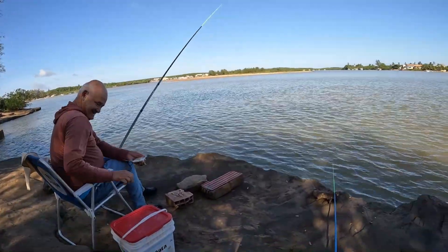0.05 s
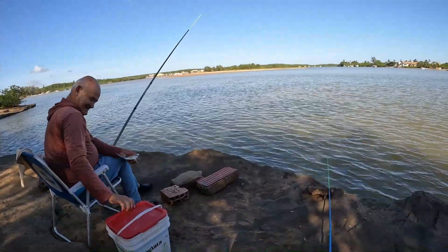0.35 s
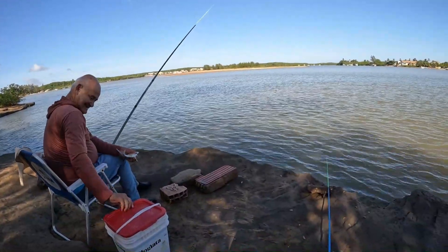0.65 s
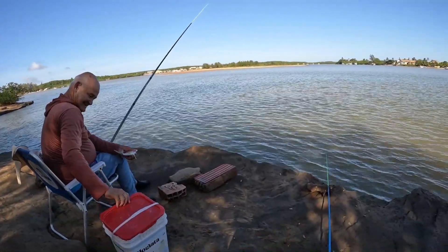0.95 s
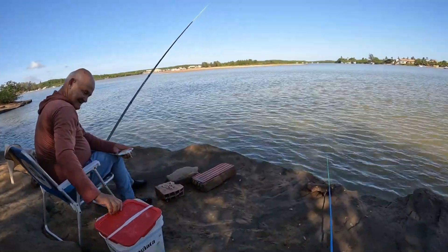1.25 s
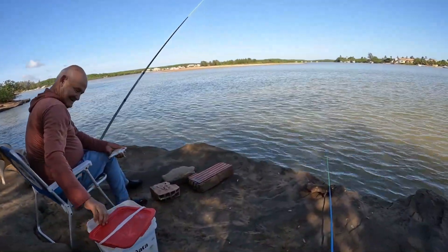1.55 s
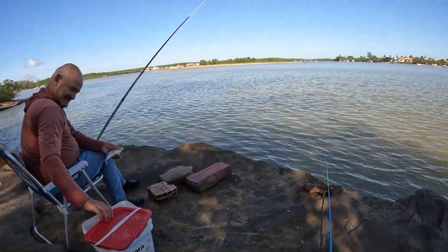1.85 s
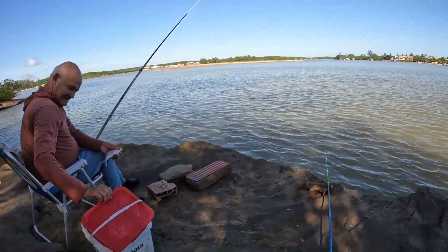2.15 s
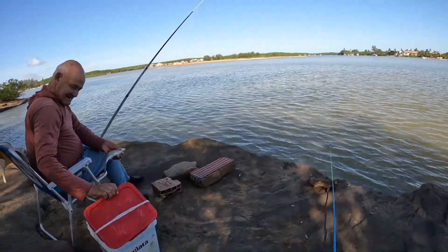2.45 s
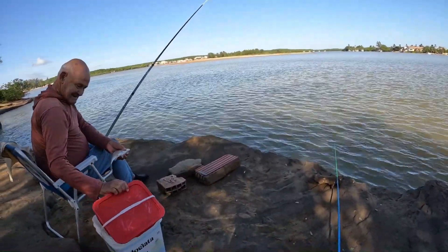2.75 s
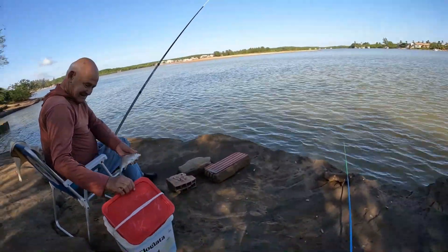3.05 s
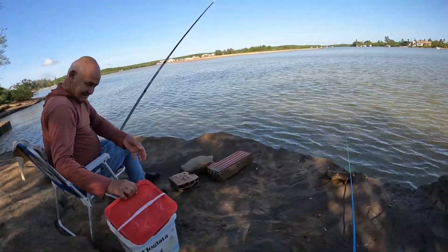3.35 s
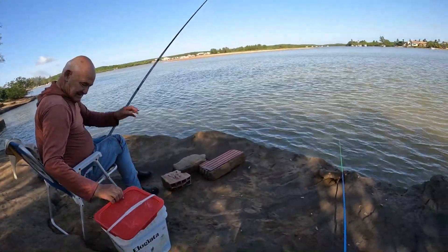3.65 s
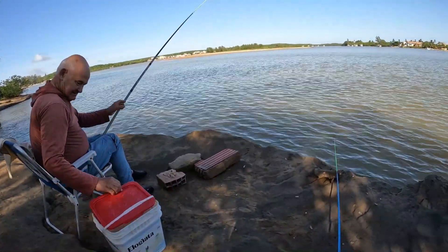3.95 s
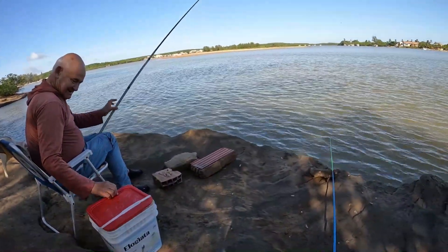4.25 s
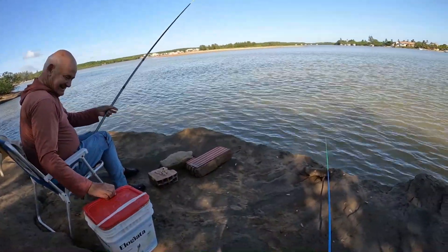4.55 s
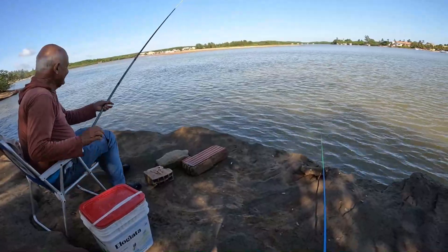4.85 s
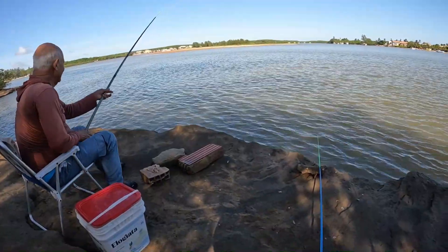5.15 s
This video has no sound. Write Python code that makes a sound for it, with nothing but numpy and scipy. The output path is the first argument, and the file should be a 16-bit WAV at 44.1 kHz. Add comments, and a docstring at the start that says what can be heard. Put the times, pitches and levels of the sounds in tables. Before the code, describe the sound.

Soft wind rumbles on the microphone throughout, with a faint hiss of river ripples. A sleeve brushes past at the very start, and very faint, distant birdlike whistles come between 0.6 and 2 seconds. Close on the left, a plastic bucket knocks sharply at about 1.1 seconds, with a hollow thump and a short scrape, and again at 1.6. From 2.1 to 2.9 seconds its lid clacks and rattles while the base scrapes over gritty ground, squeaking briefly. After a short lull, a busier stretch runs from 3.4 to 4.7 seconds, with repeated dragging strokes, lid clacks, dull thumps from the flexing walls and a few small squeaks. The loudest knocks land at about 4 and 4.5 seconds. Then the bucket goes quiet, leaving a light rustle of cloth, wind and water until a little past 5 seconds.

```python
"""Wind rumbles on the microphone and ripples hiss faintly along a riverbank; far off, thin birdlike whistles.
Close by on the left a sleeve brushes past and a hand grips a plastic bucket by its snap-on lid,
tilts it, drags it over gritty ground and sets it down. The lid clacks on the rim, the walls flex
with dull thumps, and the base scrapes in short strokes, squeaking now and then as the plastic rubs."""
import sys
import numpy as np
from scipy import signal
from scipy.io import wavfile
from scipy.ndimage import uniform_filter1d

SR = 44100
rng = np.random.default_rng(int(sys.argv[2]) if len(sys.argv) > 2 else 0)


def wav_out(sig):
    """Save sig, one row per channel (or a flat mono array), as 16-bit PCM at SR to the path in sys.argv[1]."""
    wavfile.write(sys.argv[1], SR, np.round(np.clip(np.atleast_2d(sig).T, -1, 1) * 32767).astype(np.int16))


N = 233906
RING_SAMPLES = SR // 3
WALL_TOP_HZ, PANEL_TOP_HZ = 418, 2410   # where the walls' boom and the lid's clack end


def from_db(db):
    """Decibels to gain."""
    return 10 ** (np.asarray(db) / 20)


def decay(t, t60):
    """A gain that falls 60 dB in t60 seconds."""
    return from_db(-60 * t / t60)


def unit_rms(x):
    """Scale to rms 1."""
    return x / np.sqrt(np.mean(x ** 2) + 1e-20)


def unit_burst(x):
    """Scale so that the loudest 4 ms have rms 1."""
    return x / np.sqrt(uniform_filter1d(x ** 2, size=176).max() + 1e-20)


def at_hz(table, hz, column=1):
    """Read a column of a spectrum on a log-frequency axis."""
    table = np.array(table)
    return np.interp(np.log(hz), np.log(table[:, 0]), table[:, column])


def passband(x, hz, kind, order=2):
    """Causal Butterworth filter."""
    return signal.sosfilt(signal.butter(order, hz, kind, fs=SR, output="sos"), x)


def emphasise(x, hz, boost_db, q):
    """Lift one resonance out of a sound."""
    return x + (from_db(boost_db) - 1) * signal.lfilter(*signal.iirpeak(hz, q, fs=SR), x)


def add(track, s, sound):
    """Mix a sound into a track from time s."""
    start = max(0, round(s * SR))
    track[start:start + len(sound)] += sound[:N - start]


def drift(per_s, count):
    """A wandering line through per_s normal random values a second."""
    knots = rng.standard_normal(4000)
    return np.interp(np.arange(count) * per_s / SR, np.arange(len(knots)), knots)


def noise_bands(count, channels, low_hz):
    """Half-octave bands of white noise, neighbours unrelated: (centre Hz, channels x count)."""
    edges = low_hz * 2 ** np.arange(0, np.log2(SR / 2.2 / low_hz), .5)
    white = rng.standard_normal((2, channels, count))
    return [(np.sqrt(lo * hi), passband(white[k % 2], [lo, hi], "band"))
            for k, (lo, hi) in enumerate(zip(edges, edges[1:]))]


def glides(rows, waver_per_s):
    """Gliding tones with an unsteady pitch, each fading in and out."""
    out = np.zeros(N)
    for s, length, start_hz, end_hz, level_db, waver in rows:
        count = int(length * SR)
        hz = np.linspace(start_hz, end_hz, count) * (1 + waver * drift(waver_per_s, count))
        tone = np.sqrt(2) * np.sin(2 * np.pi * np.cumsum(hz) / SR)
        add(out, s, from_db(level_db) * np.hanning(count) * tone)
    return out


# how alike the open air is on the microphone's two sides: f/Hz, likeness/0-1
AIR_LIKENESS = [(25, 0.92), (60, 1), (300, 0.91), (1000, 0.18), (3000, 0.67), (8000, 0.7), (14000, .3)]
def open_air(spectrum, bands, patchy_db, patches_per_s):
    """Noise all around the microphone, each band swelling and sinking on its own; rms 1."""
    out = 0
    for hz, (mid, side) in bands:
        alike = at_hz(AIR_LIKENESS, hz)
        gain = from_db(at_hz(spectrum, hz) + patchy_db * drift(patches_per_s, N))
        out = out + gain * (np.sqrt(1 + alike) * mid + np.sqrt(1 - alike) * side * [[1], [-1]])
    return unit_rms(out)


# wind right on the microphone: f/Hz, relative density/dB
WIND_SPECTRUM = [(15, 4.5), (30, -3), (55, 3.5), (90, 0.5), (140, -10.5), (200, -9.5), (290, -21.5),
                 (380, -24), (600, -46), (1200, -65)]
# swells of low rumble on the microphone, from wind and the handled bucket: t/s, relative level/dB
RUMBLE_SWELLS = [(0.0, -53.5), (1.2, -36.5), (1.95, -55.5), (2.39, -38.5), (4.04, -55), (5.3, -48)]
def low_rumble(bands, mean_db=-44, swell_share=0.33):
    """A lumpy rumble of wind and handling on the microphone; it follows a share of the swells' swing."""
    swell_db = np.interp(np.arange(N) / SR, *np.transpose(RUMBLE_SWELLS))
    low_bands = [b for b in bands if b[0] < WIND_SPECTRUM[-1][0]]
    rumble = open_air(WIND_SPECTRUM, low_bands, patchy_db=4.5, patches_per_s=32)
    return from_db(mean_db + swell_share * (swell_db - swell_db.mean())) * rumble


# water at the shoreline, some way off: f/Hz, relative density/dB
RIPPLE_SPECTRUM = [(300, -6), (700, -9), (1300, 2.5), (2300, -2.5), (3500, -10.5), (5000, -6), (7000, -9.5),
                   (10000, -19.5), (12000, -28), (16000, -45)]
# swells of the background water hiss: peak t/s, half width/s, wash swell/dB, fizz swell/dB
HISS_SWELLS = [(.03, 0.19, 7.5, 11), (.55, 0.36, 4, 0.5), (1.25, 0.33, 8, 9.5), (3.3, .15, 4.5, 6.5),
               (4.78, 0.22, 10, 3.5), (5.05, 0.41, 1, 10)]
def ripples(bands, base_wash_db=-70.5, base_fizz_db=-79, fizz_from_hz=4000):
    """Water hisses, a wash with a fizz on top: louder at first, then sinking, and up again at the end."""
    t = np.arange(N) / SR
    wash_db, fizz_db = sum(np.outer(swells_db, np.exp(-((t - s) / width) ** 2))
                           for s, width, *swells_db in HISS_SWELLS)
    wash_bands = [b for b in bands if RIPPLE_SPECTRUM[0][0] < b[0] < fizz_from_hz]
    fizz_bands = [b for b in bands if b[0] >= fizz_from_hz]
    wash = open_air(RIPPLE_SPECTRUM, wash_bands, patchy_db=3, patches_per_s=17)
    fizz = open_air(RIPPLE_SPECTRUM, fizz_bands, patchy_db=0.5, patches_per_s=12)
    return from_db(base_wash_db + wash_db) * wash + from_db(base_fizz_db + fizz_db) * fizz


# rubbing cloth: f/Hz, relative density/dB
CLOTH_SPECTRUM = [(700, -9), (1200, -14), (1900, 5.5), (3000, -6.5), (5000, -6), (7000, -7), (9500, -20),
                  (12000, -20), (15000, -28)]
# the arm passes near the microphone: t/s, length/s, level/dB
SLEEVE_SWISHES = [(0.101, 0.084, -47.5), (0.153, 0.068, -62), (3.16, 0.13, -65.5), (4.67, 0.12, -58),
                  (5.248, 0.071, -65)]
def sleeve(snag_db=3.5, snags_per_s=396):
    """Short swells of fibre noise, roughened by the snagging weave."""
    out = np.zeros(N)
    for s, length, level_db in SLEEVE_SWISHES:
        count = int(length * SR)
        bands = noise_bands(count, channels=1, low_hz=640)
        fibres = sum(from_db(at_hz(CLOTH_SPECTRUM, hz)) * noise[0] for hz, noise in bands)
        snags = from_db(snag_db * drift(snags_per_s, count))
        add(out, s, from_db(level_db) * np.hanning(count) * unit_rms(fibres * snags))
    return out


# clear modes of the lidded bucket: f/Hz, relative level/dB, t60/s
BUCKET_MODES = [(69.7, -4, 0.2), (103.7, -0.5, 0.18), (131, -8.5, 0.3), (188, -6, 0.29), (223, 2.5, 0.19),
                (258.3, -3.5, 0.19), (294.1, 4, 0.14), (320.4, 0.5, 0.13), (367, -13, 0.175),
                (435, -9, 0.054), (462, -2.5, 0.068), (589, 2, 0.032), (672, -18, 0.2), (876, 0.5, 0.15),
                (877, 0.5, 0.073), (980, -0.5, 0.027), (1076, -7.5, 0.051), (1120, -6, 0.22),
                (1256, -0.5, 0.091), (1375, -4, 0.13), (1607, -37, 0.052), (1849, -6.5, 0.22),
                (2000, -8, 0.14), (2454, -3.5, 0.06)]
# crowded, quickly damped modes of the plastic: f/Hz, relative density/dB, t60/s
PLASTIC_CLATTER = [(99, 13, 0.088), (290, 4.5, 0.045), (455, -6.5, 0.14), (750, 2.5, 0.039),
                   (1220, 1.5, 0.054), (2400, 0, 0.05), (3750, -3, 0.032), (6200, -9.5, 0.053),
                   (8060, -17.5, 0.071), (10400, -46, 0.0315), (11900, -16, 0.0056), (15000, -29, .02)]
def bucket_rings(count, modes_db, vary_db, detune=0.0018, edge_own_share=0.79):
    """The bucket tapped at count spots: clear modes, detuned by the grip, over a short dense clatter."""
    t = np.arange(RING_SAMPLES) / SR
    hz, level_db, t60 = np.transpose(BUCKET_MODES)
    modes = np.sin(2 * np.pi * hz[:, None] * t) * decay(t, t60[:, None])
    strengths = from_db(modes_db + level_db + vary_db * rng.standard_normal((count, len(hz))))
    strengths *= rng.choice([-1, 1], strengths.shape)
    grips = 1 + detune * rng.standard_normal(count)
    rings = np.array([np.interp(t * grip, t, ring) for grip, ring in zip(grips, strengths @ modes)])
    short = RING_SAMPLES // 4
    for centre, noise in noise_bands(short, count + 1, low_hz=80):
        # the small stiff edges ring partly alike wherever the bucket is touched
        own = edge_own_share if centre > PANEL_TOP_HZ else 1
        clatter = np.sqrt(own) * noise[1:] + np.sqrt(1 - own) * noise[0]
        fade = decay(t[:short], at_hz(PLASTIC_CLATTER, centre, column=2))
        rings[:, :short] += from_db(at_hz(PLASTIC_CLATTER, centre)) * clatter * fade
    return rings


def registers(x):
    """Split into the boom of the walls, the clack of the lid panel and the snap of the edges."""
    return (passband(x, WALL_TOP_HZ, "low", order=4),
            passband(x, [0.62 * WALL_TOP_HZ, PANEL_TOP_HZ], "band", order=3),
            passband(x, PANEL_TOP_HZ, "high", order=3))


# lid, rim and base knock, close up: t/s, clack level/dB, snap level/dB, chatter/ms, struck spot f/Hz
CONTACTS = [(0.213, -51, -76, 9.7, 700), (0.733, -62, -58, 2.5, 5990), (1.055, -35, -36, 2.8, 2700),
            (1.104, -21.5, -25, 1.4, 3140), (1.181, -61, -31.5, 2.2, 6400), (1.571, -35.5, -40.5, 20, 2360),
            (1.595, -24.5, -35.5, 3.3, 990), (1.63, -32, -60, 8.8, 890), (2.2, -32, -30, 3.1, 5130),
            (2.278, -36, -60, 6.3, 800), (2.328, -22, -39.5, 9, 875), (2.341, -24.5, -32, 2.1, 1800),
            (2.507, -31, -34.5, 2.2, 6340), (2.627, -39.5, -51, 5.1, 1780), (2.65, -27, -38.5, 8.1, 900),
            (2.696, -33, -44, 6.4, 1500), (2.738, -27.5, -33.5, 4.4, 2570), (2.766, -30, -35.5, 8.2, 2500),
            (3.067, -59, -64.5, 2.8, 1890), (3.375, -34.5, -38.5, 16.8, 1430),
            (3.581, -32, -38.5, 8.4, 750), (3.641, -26.5, -38, 2.1, 1590), (3.721, -29.5, -36, 21, 925),
            (3.864, -48, -35.5, 14, 4620), (3.897, -30.5, -40, 8.4, 1250), (3.929, -33, -34.5, 6.4, 3580),
            (3.986, -18, -26, 0.68, 1120), (4.06, -33, -28.5, 4.8, 4640), (4.085, -25, -35.5, 6.6, 2060),
            (4.215, -32.5, -30.5, 8, 5400), (4.362, -35, -32, 12, 3240), (4.405, -26, -38, 13, 755),
            (4.508, -37.5, -40, 3.3, 2500), (4.536, -25.5, -26, 5.4, 6530), (4.548, -20, -25.5, 3, 900),
            (4.555, -18, -27.5, 16.2, 880), (4.623, -34.5, -38, 5.5, 2030), (4.924, -77, -54.5, 2.4, 8000)]
def knocks(rebound=0.24, boom_db=-11.5, direct=2.66, direct_s=0.00073, hand_t60=0.32, soft_hz=10800):
    """Each hard contact is a tap and a brief chatter, coloured by the struck spot; the walls boom along."""
    out, t, ms = np.zeros(N), np.arange(RING_SAMPLES) / SR, np.arange(1500) * 1000 / SR
    draws = rng.standard_normal((len(CONTACTS), len(ms)))
    # the first wave is stronger than what comes back around the wall, and the hand damps the rest
    fade = (1 + direct * np.exp(-t / direct_s)) * decay(t, hand_t60)
    rings = bucket_rings(len(CONTACTS), modes_db=-20.5, vary_db=3) * fade
    for (s, clack_db, snap_db, chatter_ms, spot_hz), draw, ring in zip(CONTACTS, draws, rings):
        force = rebound * draw * (abs(draw) > 2) * np.exp(-(ms / chatter_ms) ** 2)
        force[0] = 1   # the tap itself
        struck = emphasise(signal.fftconvolve(force, ring), spot_hz, boost_db=7, q=5.8)
        boom, clack, snap = registers(struck)
        # a contact that is mostly clack is soft and loses its top, an octave per 25 dB
        top_hz = np.clip(soft_hz * 2 ** ((snap_db - clack_db) / 25), PANEL_TOP_HZ, SR / 2.5)
        snap = passband(snap, top_hz, "low")
        body = from_db(boom_db) * unit_burst(boom) + unit_burst(clack)
        add(out, s, from_db(clack_db) * body + from_db(snap_db) * unit_burst(snap))
    return out


# the walls give under a push or a landing, close up: t/s, relative level/dB, f/Hz
WALL_FLEXES = [(0.214, -31.5, 152), (0.296, -37, 290), (0.919, -28.5, 258), (1.065, -22, 205),
               (1.103, -13.5, 259), (1.129, -23, 238), (1.603, -18, 290), (1.634, -20, 285),
               (2.117, -32, 226), (2.342, -17.5, 213), (2.437, -20, 141), (2.655, -18, 139),
               (2.671, -23, 133), (2.505, -25, 106), (2.774, -19, 84), (3.374, -23.5, 215),
               (3.389, -25, 114), (3.586, -18, 177), (3.629, -16.5, 114), (3.644, -16, 269),
               (3.659, -17, 264), (3.963, -23.5, 235), (3.99, -18.5, 243), (4.066, -8, 252),
               (4.221, -19, 237), (4.243, -16, 217), (4.404, -10, 228), (4.424, -17, 114), (4.542, -9, 190),
               (4.561, -6.5, 265), (4.577, -12.5, 87)]
def thumps(flex_t60=0.057, rise_s=0.0025, boom_gain=0.63, spread_s=0.0081, trim_db=-3):
    """A wall buckles, swings a few times under the damping hand and slowly wakes the low modes."""
    out, t = np.zeros(N), np.arange(RING_SAMPLES) / SR
    booms, _, _ = registers(bucket_rings(len(WALL_FLEXES), modes_db=-24.5, vary_db=1.5))
    for (s, level_db, hz), boom in zip(WALL_FLEXES, booms):
        flex = np.sin(2 * np.pi * hz * t) * decay(t, flex_t60) * (1 - np.exp(-(t / rise_s) ** 2))
        boom = boom * (1 - np.exp(-t / spread_s))
        thump = flex / abs(flex).max() + boom_gain * boom / abs(boom).max()
        add(out, s, from_db(level_db + trim_db) * thump)
    return passband(out, hz=51.7, kind="high")   # so small a wall radiates no deep bass


# far off, centred: t/s, length/s, start f/Hz, end f/Hz, level/dB, waver/share of pitch
FAR_WHISTLES = [(0.62, 0.3, 4140, 4080, -78, .006), (0.68, .3, 3800, 3800, -79, 0.0052),
                (0.682, 0.22, 2250, 2250, -73, .005), (1.24, 0.36, 6000, 6880, -68, 0.062),
                (1.934, 0.056, 7000, 7560, -66.5, .07)]
def whistles():
    """Thin, wavering whistles, like distant birds."""
    return glides(FAR_WHISTLES, waver_per_s=850)


# the base slides on the ground near the microphone, levels before the balance set in scrapes():
# t/s, length/s, mid-stroke rasp level/dB, swell start to end/dB, grit offset/dB, rumble offset/dB
DRAG_STROKES = [(0.847, 0.1, -59, -2, -7, 11.5), (1.068, .15, -43.5, -4.5, -6, 9),
                (1.381, 0.24, -50.5, -1.5, -9.5, 8), (1.564, 0.07, -47, -5, -8.5, 17),
                (2.113, 0.27, -47.5, 0, -8.5, 11), (2.314, 0.071, -35.5, 2, -9.5, 4),
                (2.405, 0.13, -51.5, -14, -18, 6.5), (2.512, .2, -47, 6, -8, 13),
                (2.748, 0.056, -42.5, -16.5, -4.5, 5), (2.829, 0.054, -43.5, 1.5, -7, 6.5),
                (3.227, 0.022, -64, -7, -21, 19), (3.478, 0.022, -44, -4, -18.5, 10.5),
                (3.553, 0.024, -43.5, -9, 1.5, 0), (3.572, 0.139, -40.5, 9.5, -3.5, 7),
                (3.722, 0.19, -39.5, 7, -3, 3.5), (3.917, 0.22, -41, -1.5, -5, 10.5),
                (4.178, 0.1, -39, 3, -4.5, 4.5), (4.291, 0.19, -40, 4.5, -2, 2),
                (4.513, 0.14, -44.5, -3.5, -2, 12.5), (4.646, 0.14, -59.5, -14, 1, 6.5)]
def stroke_pressure(attack_s=0.0085, release_s=0.017, linger_db=-16.5, linger_s=0.069,
                    snags_per_s=16, snag_db=3, snag_s=0.0086):
    """Each stroke takes hold, swells or sags and eases to a light rub: gains of rumble, rasp and grit."""
    t, pressure = np.arange(N) / SR, np.zeros((3, N))
    for s, length, level_db, swell_db, grit_db, rumble_db in DRAG_STROKES:
        before, after = np.maximum(s - t, 0), np.maximum(t - s - length, 0)
        grip = np.exp(-before / attack_s - after / release_s)
        linger = from_db(linger_db) * np.exp(-before / attack_s - after / linger_s)
        hold = from_db(level_db + swell_db * (np.clip((t - s) / length, 0, 1) - .5))
        stroke = np.maximum(grip, linger) * hold
        pressure = np.maximum(pressure, stroke * from_db([[rumble_db], [0], [grit_db]]))
    # the base snags on a pebble and the load surges
    snags = rng.random(N) < snags_per_s / SR
    surges = signal.lfilter([1], [1, -np.exp(-1 / (snag_s * SR))], snags + 1e-18)
    return pressure * from_db(snag_db * np.minimum(surges, 1))


def scrapes(slips_per_s=2200, spread_db=4.5, judder_db=2, judder_per_s=110, wander_db=6, wander_per_s=40):
    """Plastic catches and slips on grains, juddering as the load wanders among spots of different pitch."""
    rings = bucket_rings(count=10, modes_db=-23.5, vary_db=3)
    sizes_db = spread_db * np.minimum(rng.exponential(1, N), 4.3) + judder_db * drift(judder_per_s, N)
    slips = from_db(sizes_db) * rng.choice([-1, 1], N) * (rng.random(N) < slips_per_s / SR)
    spot = rng.integers(0, len(rings), N)
    loads = from_db([wander_db * drift(wander_per_s, N) for _ in rings])
    loads /= np.sqrt(np.sum(loads ** 2, axis=0))
    sliding = np.zeros(N)
    for k, spot_hz in enumerate(np.geomspace(850, 7000, len(rings))):
        ring = emphasise(rings[k], spot_hz, boost_db=5.5, q=2.7)
        sliding += signal.oaconvolve(slips * loads[k] * (spot == k), ring)[:N]
    rumble, rasp, grit = stroke_pressure() * [unit_rms(voice) for voice in registers(sliding)]
    return from_db(-2) * rumble + from_db(-1) * rasp + grit


# at the bucket, close up: t/s, length/s, start f/Hz, end f/Hz, level/dB, waver/share of pitch
RUB_SQUEAKS = [(2.263, 0.097, 958, 870, -40, 0.028), (2.406, .105, 1660, 1574, -50.5, 0.044),
               (2.412, 0.048, 3220, 3230, -57, .03), (2.85, 0.074, 1764, 1590, -47, 0.095),
               (3.659, 0.016, 1810, 1980, -36.5, 0.035), (3.667, 0.0326, 1970, 1540, -37, 0.084),
               (3.813, 0.038, 1905, 2400, -38.5, 0.056), (4.685, 0.056, 846, 855, -45, 0.025)]
def squeaks():
    """The plastic squeaks in short, unsteady glides as it rubs."""
    return glides(RUB_SQUEAKS, waver_per_s=630)


def from_the_left(x, shade=.24, shade_hz=2770, ground_db=-16, ground_s=.0021, ground_hz=566,
                  scatter_db=-13, scatter_hz=7000, scatter_t60=0.13):
    """The camera body shades the treble on the right; the ground reflects, chair and rocks scatter."""
    t = np.arange(RING_SAMPLES // 2) / SR
    treble = x - signal.sosfiltfilt(signal.butter(1, shade_hz, fs=SR, output="sos"), x)
    delayed = np.interp(np.arange(N) - ground_s * SR, np.arange(N), x)
    ground = passband(delayed, ground_hz, "high", order=3)
    echoes = rng.standard_normal(len(t)) * decay(t, scatter_t60)
    echoes = passband(echoes / np.sqrt(np.sum(echoes ** 2)), scatter_hz, "high", order=1)
    scatter = signal.oaconvolve(x, echoes)[:N]
    side = shade * treble + from_db(ground_db) * ground + from_db(scatter_db) * scatter
    return x + side * [[1], [-1]]


def scene():
    """A stereo microphone on the bank: the bucket close on the left, wind and river all around."""
    bucket = knocks() + thumps() + scrapes() + squeaks()
    near = from_the_left(bucket + sleeve())
    far = whistles()
    air_bands = noise_bands(N, channels=2, low_hz=16)
    return near + far + low_rumble(air_bands) + ripples(air_bands)


def record(dry, ceiling=0.95, port_hz=11850, treble_hz=12640, cutoff_hz=16600):
    """The loudest thumps are rounded; the microphone port rings, and above it the top fades, then is cut."""
    rounded = ceiling * np.tanh(dry / ceiling)
    ported = emphasise(rounded, port_hz, boost_db=7.5, q=44)
    dulled = passband(ported, treble_hz, "low", order=5)
    return signal.sosfilt(signal.cheby2(14, 70, cutoff_hz, fs=SR, output="sos"), dulled)


dry = scene()
out = record(dry)
wav_out(out)
```